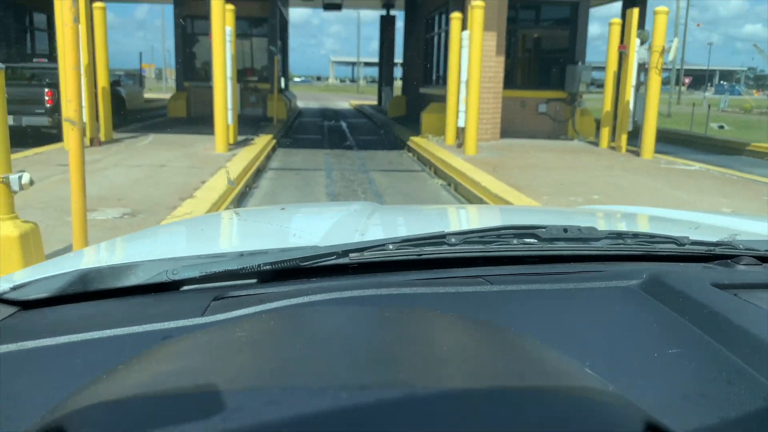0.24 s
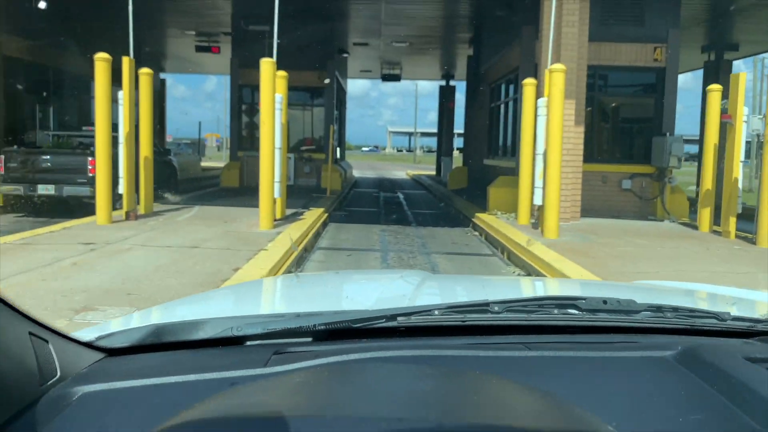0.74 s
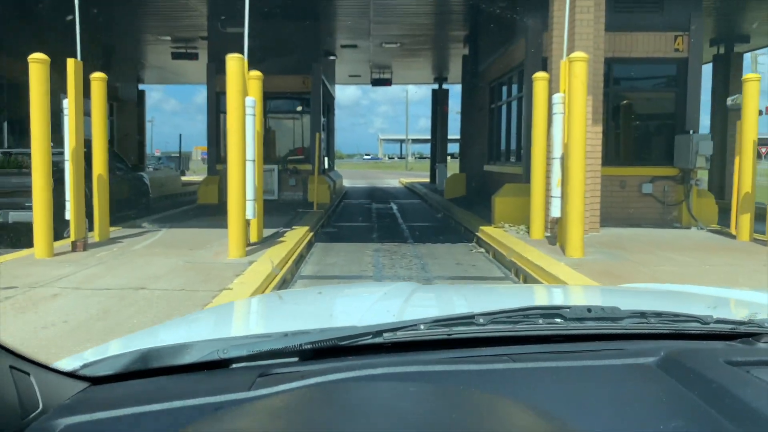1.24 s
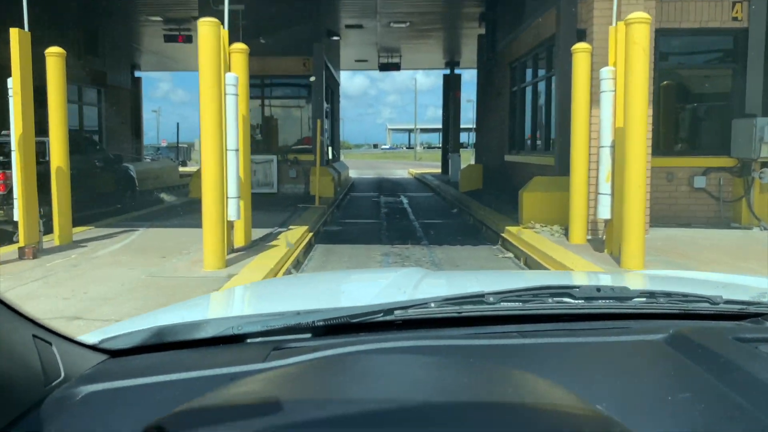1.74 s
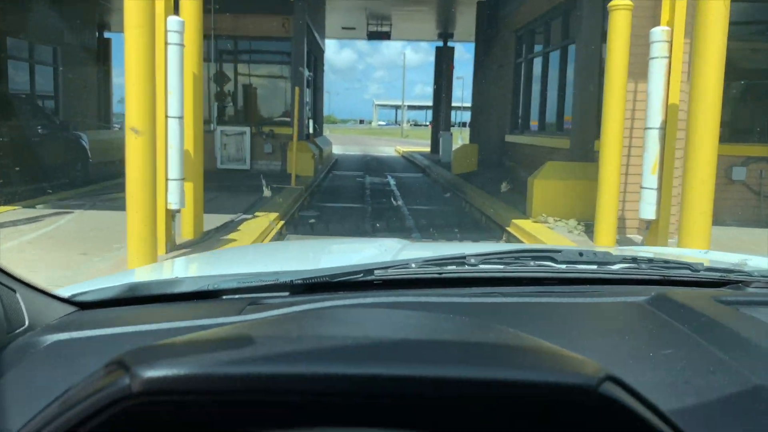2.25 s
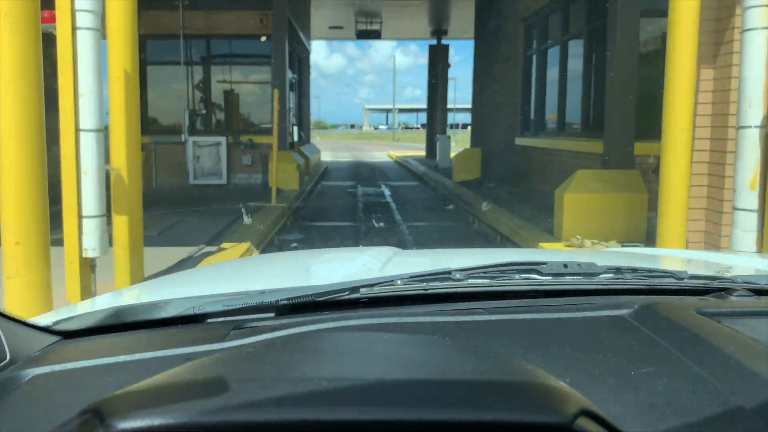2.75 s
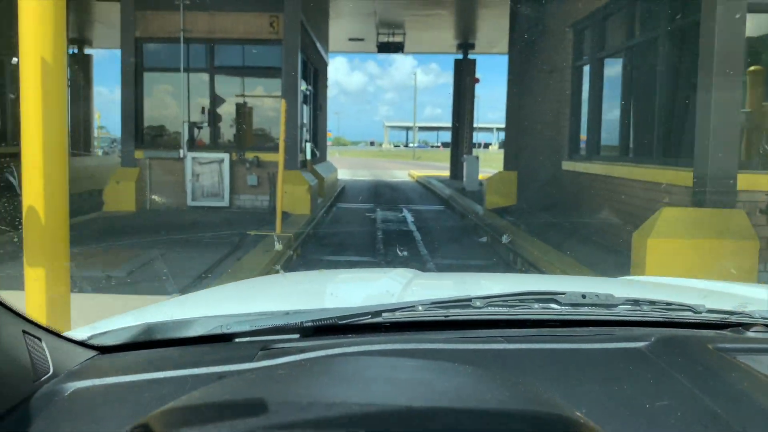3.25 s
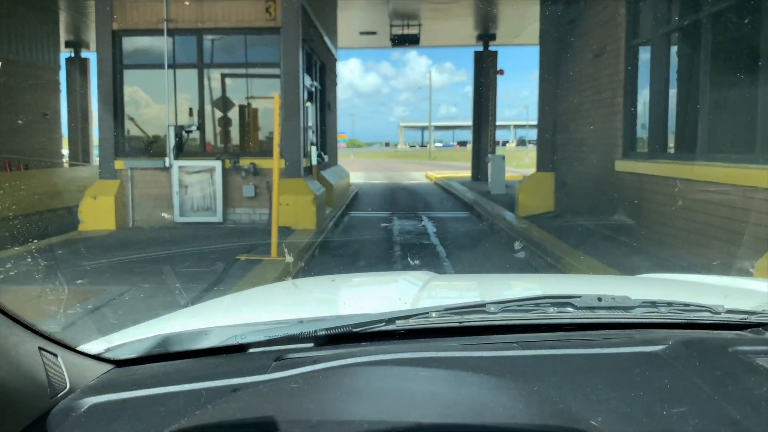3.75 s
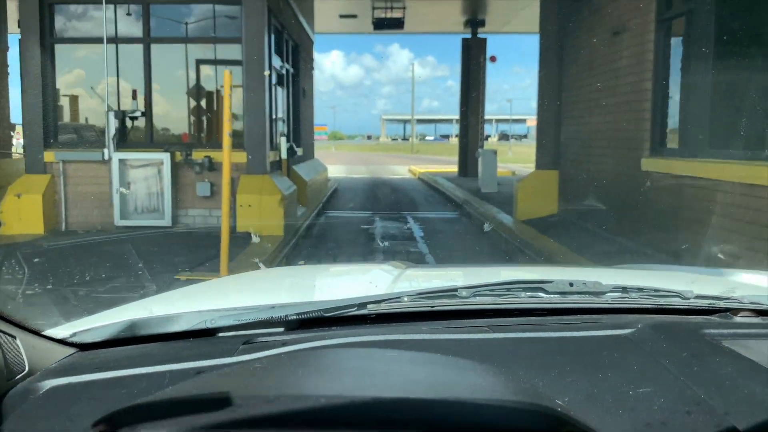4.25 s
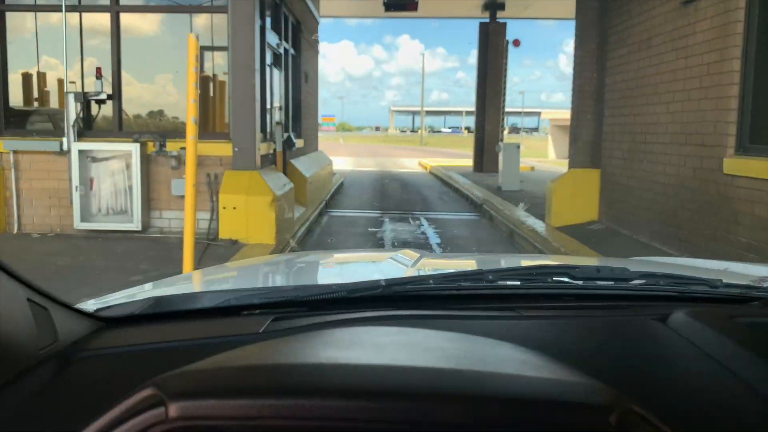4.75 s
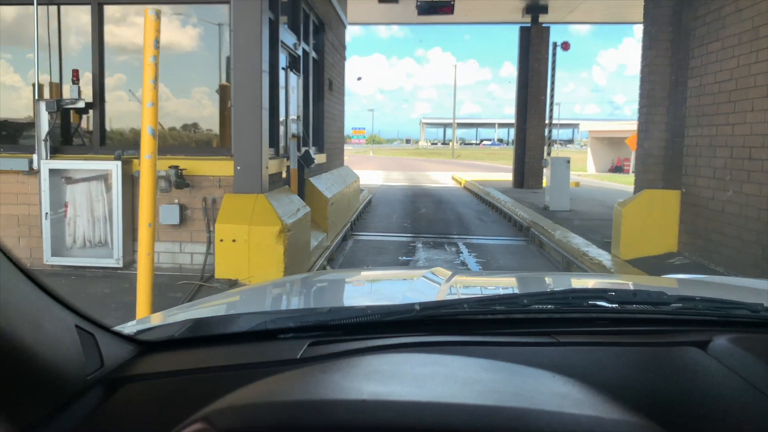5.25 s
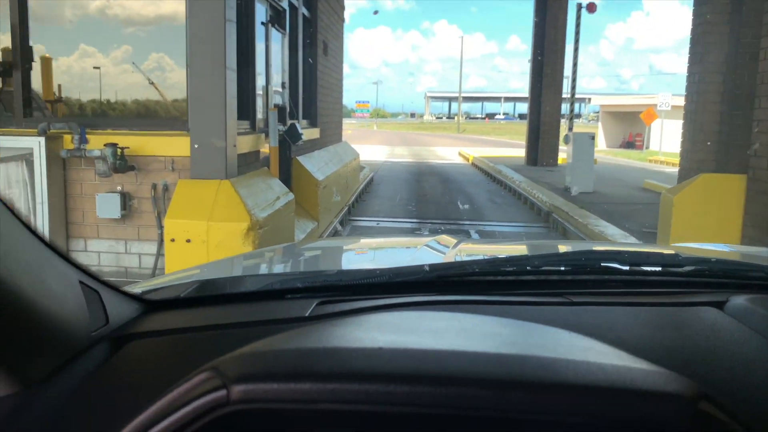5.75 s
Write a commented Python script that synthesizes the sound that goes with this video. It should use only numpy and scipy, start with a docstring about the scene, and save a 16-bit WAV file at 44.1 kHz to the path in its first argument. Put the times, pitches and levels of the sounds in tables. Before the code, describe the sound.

From inside a cab, low tyre rumble as a truck creeps over loose steel plates that slam and clang, with thin high brake squeals.

```python
"""An electric pickup with a loaded trailer creeps onto a truck scale under a canopy, heard from the cab.
Tyre rumble, a tread drone, road hiss and a faint shimmer (shaped noise, tone, tiny tones) join a hum.
Dull knocks start just before 1 s; then plates grate and slam four times from 1 s to 4 s:
bouncing contacts excite noisy steel clangs, chassis thuds and ringing modes, and low sine tones follow.
From the first slam on, thin brake squeals hop between gliding tones; road hiss swells near 4 s."""
import sys
import numpy as np
from scipy import signal
from scipy.fft import rfft, irfft
from scipy.io import wavfile

SR = 44100
rng = np.random.default_rng(int(sys.argv[2]) if len(sys.argv) > 2 else 0)


def store_pcm(level_fs):
    """Save levels as 16-bit WAV."""
    pcm = np.round(np.clip(level_fs, -1, 1) * 32767).astype(np.int16)
    wavfile.write(sys.argv[1], SR, np.atleast_2d(pcm).T)


N = 265041
TIME = np.arange(N) / SR

# likeness of the cab's noise at the two microphones: in step in the bass, opposed in the middle
# (frequency [Hz], correlation [-1 to 1])
EAR_LIKENESS = [(40, 0.94), (200, 0.88), (290, 0.4), (400, 0.048), (540, -0.54), (750, -0.43),
                (1150, -0.73), (1750, -0.51), (2050, 0.55), (2450, 0.25), (2950, 0.077), (3500, -0.22),
                (4500, 0.07), (5700, -0.12), (8000, -0.024)]

# rolling levels before each layer's trim
# (time [s], rumble level [dB], road hiss level [dB], body boom level [dB])
ROLLING_LEVELS = [(0, -26.5, -36.5, -22), (.9, -29.5, -39.5, -26.5), (1.35, -24, -40.5, -27.5),
                  (1.8, -30, -40, -31), (2.6, -22, -38.5, -28.5), (3.05, -28.5, -37, -30.5),
                  (3.6, -26, -36.5, -28.5), (4.0, -18, -31.5, -26), (4.45, -27.5, -34, -29),
                  (5.3, -26.5, -34.5, -31.5), (6, -26.5, -37, -28.5)]
# colour of the tyre rumble (frequency [Hz], relative level [dB per Hz])
RUMBLE_COLOUR = [(18, -18), (30, -12), (38, -4), (55, 5.5), (75, 2.5), (105, 3), (130, 1.5), (185, -4),
                 (250, -14.5), (350, -21), (500, -18), (900, -97)]
# colour of the body panels' share of the rumble (frequency [Hz], relative level [dB per Hz])
BODY_COLOUR = [(90, -28), (140, 0.5), (178, 5), (240, -8), (340, -7.5), (420, -16.5), (600, -22.5),
               (1200, -50.5)]
# colour of the road hiss (frequency [Hz], relative level [dB per Hz])
HISS_COLOUR = [(200, -32), (420, 4), (600, 1), (900, 5), (1600, 2), (2200, -1), (3100, -4.5), (5200, -8),
               (6500, -12.5), (10000, -21.5), (13800, -36), (15000, -40)]
# air resonances of the cab that colour the rolling noise (centre [Hz], width [Hz], lift [dB])
CAB_MODES = [(196.7, 41, 3), (257.8, 22.7, 7), (345, 32, 4), (449, 32, 3.5), (710, 63, 5), (965, 45, 5),
             (1355, 60, 5.5), (2015, 75, 2)]
# tread blocks meeting the road at a rate that follows speed (time [s], pitch [Hz], level [dB])
TREAD_COURSE = [(0, 60.85, -40), (.85, 69.4, -28.5), (1.8, 73.4, -27.5), (3.0, 76, -29.5), (3.6, 78.2, -25),
                (4.4, 79.77, -32), (6, 76, -38)]
# the drone swells once in each wheel turn; one such swell peaks at SWELL_S
BLOCKS_PER_TURN, SWELL_S, SWELL_DB = 67.8, 0.77, 4
# largest delay of a shimmer tone between the microphones
PORT_LAG_S = 19 / SR
# centre of each wavering compressor tone (pitch [Hz], level [dB])
HUM_TONES = [(46.2, -30), (124, -41)]

# dull knocks of trailer and plates, some of them late bounces after the slams (time [s], level [dB])
DULL_KNOCKS = [(0.852, -32), (2.41, -30), (2.59, -24.5), (2.625, -31), (3.48, -25), (3.504, -35),
               (3.783, -16.5), (3.855, -21), (4.141, -30), (4.19, -24), (4.31, -22.5), (4.79, -23),
               (4.815, -32.5)]
# colour of a knock (frequency [Hz], relative level [dB per Hz])
KNOCK_COLOUR = [(120, 16), (280, 21), (550, 8.5), (900, 4.5), (2200, 0), (3800, -16.5), (5500, -12),
                (12000, -37)]

# the tyre presses a plate onto its seat just before it slams (time [s], level [dB])
PLATE_SCUFFS = [(1.005, -31.5), (2.241, -21.5), (3.696, -21.5)]
# colour of a scuff (frequency [Hz], relative level [dB per Hz])
SCUFF_COLOUR = [(150, 3), (500, 0), (800, 7.5), (1500, 1), (2400, 0), (3700, -7), (4500, -21), (12000, -33)]

# a wheel drops on a loose plate
# (time [s], clang level [dB], thud level [dB], slowness of the bounces [factor],
#  pitch favoured by the strike point [Hz], brightness [dB per octave], extra clang of first touch [dB])
PLATE_SLAMS = [(1.053, -11, -14, 0.88, 1370, 0.1, -0.5), (2.279, -10.5, -13, 0.88, 2700, 0.56, 2),
               (3.705, -10, -11, 1.0, 1500, 0.9, -1), (3.996, -11, -12, 1.15, 2400, 1, -1.5)]
# bounce pattern shared by all slams, before slowness and scatter
# (time after the first touch [s], clang change [dB], thud change [dB])
PLATE_BOUNCES = [(0, -3.5, -4), (.017, -1, -0.5), (.031, -3.5, -5), (.052, -7.5, -5.5), (.1, -15, -8),
                 (.17, -43, -8)]
# colour of a plate's dense higher modes (frequency [Hz], relative level [dB per Hz])
CLANG_COLOUR = [(200, -28), (400, -1), (580, -1), (720, 5.5), (1050, 4.5), (1550, 3.5), (2150, 1),
                (2800, -4.5), (3900, -4), (5000, -7.5), (6500, -11), (10000, -15), (14000, -22),
                (15500, -55)]
# colour of the thud that comes through the chassis (frequency [Hz], relative level [dB per Hz])
THUD_COLOUR = [(22, -40), (60, -12), (120, 1), (185, 3.5), (250, -2), (320, -5), (380, -5), (470, -10.5),
               (600, -21.5), (1200, -73)]
# strongest ringing modes of a plate (pitch [Hz], relative level [dB], decay t60 [s])
PLATE_MODES = [(189.7, 0, 0.35), (215.3, -2, 0.26), (251, -8, 0.32), (276, -8, 0.33), (355.6, -11, 0.76),
               (384, -12.5, 0.37), (466, -13.5, 0.43), (698, -7, 0.35), (1310, -8, 0.24), (2060, -10, 0.23),
               (2290, -17, 0.17)]
RING_SIZE = 2 ** 15  # length of a plate or chassis response [samples]

# low ringing tones that follow each slam (time [s], pitch [Hz], level [dB], decay t60 [s])
LOW_TONES = [(1.066, 182.7, -6, 0.26), (1.088, 346, -15, .14), (1.149, 103, -9, 0.5), (2.289, 83, -17, 0.3),
             (2.293, 183.8, -10, 0.51), (2.3, 54, -11, 0.23), (2.32, 257.4, -18, .4),
             (3.71, 108, -12.5, 0.43), (3.745, 184.8, -10, 0.37), (3.787, 344, -13.5, 0.12),
             (4.004, 181, -13.5, 0.55), (4.026, 66, -12.5, 0.86), (4.135, 349, -19, .25),
             (4.188, 348.3, -18, 0.18)]

# the dragging brakes ring in one mode after another
# (chatter [0 to 1], left minus right [dB], lag at the left microphone [s],
#  course as rows of (time [s], pitch [Hz], level before trim [dB]))
BRAKE_SQUEALS = [ (0.16, -7, 0.000398, [(1.083, 8000, -37), (1.152, 8220, -32.5), (1.182, 8180, -28.5),
                 (1.212, 8230, -27.5), (1.327, 8180, -55)]), (1, -3, 0.000407, [(1.192, 8900, -59),
                 (1.287, 8780, -31.5), (1.407, 8750, -26.5), (1.467, 8770, -31), (1.537, 8800, -26),
                 (1.716, 8840, -62)]), (0.69, 0, .00039, [(1.232, 10570, -65), (1.277, 10340, -47),
                 (1.367, 10270, -29), (1.412, 10270, -39), (1.437, 10270, -33), (1.586, 10320, -42.5),
                 (1.601, 10260, -37), (1.626, 10360, -25.5), (1.696, 10350, -28.5), (1.755, 10350, -35),
                 (1.836, 10430, -31.5), (2.01, 10510, -60), (2.28, 10400, -53)]),
                 (0.1, -8, 0.000396, [(1.442, 8240, -58), (1.507, 8190, -41), (1.586, 8260, -58),
                 (1.641, 8190, -33), (1.691, 8200, -41), (1.796, 8195, -33), (1.936, 8240, -52)]),
                 (0.43, -10.5, 0.000385, [(1.891, 8610, -66), (1.911, 8650, -35.5), (1.941, 8500, -40),
                 (1.995, 8530, -26.5), (2.2, 8470, -69)]), (0.36, -5, .00042, [(2.09, 7400, -73),
                 (2.13, 7140, -39), (2.17, 7130, -45), (2.23, 7190, -64)]),
                 (0.093, -1, 0.000396, [(2.345, 7950, -34), (2.385, 8030, -26.5), (2.494, 7880, -42),
                 (2.539, 7970, -24.5), (2.604, 7930, -50), (2.629, 7990, -39), (2.784, 7997, -28.5),
                 (2.849, 8130, -47), (2.973, 8050, -37.5), (3.033, 8050, -41), (3.068, 8110, -30.5),
                 (3.138, 8150, -68)]), (0.3, -0.5, 0.0003986, [(3.193, 9400, -52), (3.233, 9230, -36.5),
                 (3.407, 9280, -52), (3.447, 9320, -35), (3.512, 9290, -30.5), (3.632, 9370, -45),
                 (3.727, 9320, -31.5), (3.816, 9450, -42)]), (0.1, -1, .00039, [(3.322, 10500, -67),
                 (3.367, 10760, -38.5), (3.407, 10710, -42), (3.497, 10740, -70)]),
                 (0.26, -6.5, 0.00041, [(3.392, 8780, -66), (3.427, 8770, -45), (3.612, 8730, -34),
                 (3.677, 8900, -64)]), (0.1, -6, .00039, [(3.542, 10440, -66), (3.642, 10410, -43),
                 (3.697, 10340, -45)]), (0.2, 5, 0.00041, [(3.821, 8830, -51), (3.881, 8950, -34.5),
                 (3.996, 8970, -53)]), (0.1, 1, 0.0004, [(3.861, 10360, -49), (3.956, 10550, -40),
                 (3.996, 10580, -39)]), (0.59, 1, 0.000398, [(4.111, 9460, -50), (4.185, 9260, -35.5),
                 (4.29, 9360, -52), (4.385, 9200, -70)]), (0.52, -4, 0.00041, [(4.121, 8760, -42),
                 (4.34, 8760, -36.5), (4.405, 8660, -54), (4.42, 8730, -54)]),
                 (0.36, -3.5, .00041, [(4.3, 8380, -52), (4.35, 8470, -42), (4.48, 8280, -32),
                 (4.649, 8580, -34.5), (4.779, 8500, -58)]), (0.2, 0, 0.000398, [(4.624, 9400, -64),
                 (4.659, 9380, -59), (4.779, 9540, -56)]), (1, -4.5, .000397, [(4.814, 8830, -46),
                 (4.879, 8790, -36.5), (4.954, 8810, -34.5), (5.01, 8750, -28), (5.075, 8745, -33),
                 (5.145, 8670, -26.5), (5.2, 8740, -31.5), (5.258, 8720, -37.5), (5.418, 8770, -52)]),
                 (0.66, -1, .000394, [(5.353, 10000, -60), (5.403, 10020, -37.5), (5.463, 9920, -45.5),
                 (5.552, 10070, -37.5), (5.777, 10000, -48), (5.817, 10150, -41), (6.001, 10120, -56.5)]),
                 (0.11, -3.5, 0.000415, [(5.433, 6780, -66), (5.488, 6690, -43), (5.837, 6760, -43.5),
                 (5.961, 6800, -53), (6.001, 6760, -42.5)]), (0.1, 0, .000383, [(5.612, 11640, -63),
                 (5.712, 11640, -43), (5.802, 11620, -55), (5.847, 11700, -53)]),
                 (0.92, -4, .00042, [(4.52, 5010, -54), (4.57, 5040, -47), (4.63, 5020, -51)]),
                 (1, -2, 0.00043, [(4.82, 5100, -62), (4.87, 5050, -53), (4.94, 5050, -62)]),
                 (1, -4, .00042, [(5.63, 5020, -60), (5.72, 5080, -55), (5.82, 5080, -62)]),
                 (0.89, -1, 0.000384, [(5.4, 13300, -64), (5.6, 13300, -62), (5.95, 13520, -65)])]
# moments when the pad grabs and the squeal flares (time [s], level [dB])
PAD_GRABS = [(1.616, -15), (1.762, -13.5)]
WALL_T60_S, WALL_DB = 0.18, -10  # reflections of the squeal
TOP_HZ = 15700  # where the treble is cut


def undb(db):
    """Decibels to gain."""
    return 10 ** (np.asarray(db) / 20)


def unit(x):
    """Scale to rms 1."""
    return x / np.sqrt(np.mean(x ** 2))


def curves(rows):
    """The columns of a table, joined by straight lines in time."""
    times, *columns = np.transpose(rows)
    return [np.interp(TIME, times, column) for column in columns]


def fade(t, t60):
    """Exponential decay that starts at t = 0 and falls 60 dB in t60 seconds."""
    return (t >= 0) * np.exp(-np.log(1000) * np.maximum(t, 0) / t60)


def walk(rate_hz):
    """Smooth random wandering with spread 1 that changes about rate_hz times a second."""
    hz = np.fft.rfftfreq(N, 1 / SR)
    noise = rfft(rng.standard_normal(N))
    return unit(irfft(noise * np.exp(-(hz / rate_hz) ** 2), N))


def convolve(x, response):
    """Play a signal through a two-channel response."""
    return signal.fftconvolve(np.atleast_2d(x), response, axes=1)[:, :N]


def coloured(points, db, hz):
    """Read a colour table at the given frequencies, along a logarithmic frequency axis."""
    return np.interp(np.log(hz), np.log(points), db)


def field(spectrum, size=N):
    """Coloured noise filling the cab, as the two microphones hear it."""
    hz = np.fft.rfftfreq(size, 1 / SR) + 1e-3  # keeps the logarithm finite at zero
    mid, side = rfft(rng.standard_normal((2, size)))
    alike = np.clip(np.interp(hz, *np.transpose(EAR_LIKENESS)), -0.98, 0.98)
    # the shared part meets an opposed part in the ratio that gives the wanted correlation
    opposed = side * np.array([[1], [-1]])
    ports = np.sqrt(1 + alike) * mid + np.sqrt(1 - alike) * opposed
    points, db = np.transpose(spectrum)
    return unit(irfft(ports * undb(coloured(points, db, hz)), size))


def panned(x, left_db):
    """Set the left-minus-right level; negative values lean to the right."""
    return x * undb(np.array([[left_db], [-left_db]]) / 2)


def strikes(times, db, rattle=0.43, rattle_t60=0.14, count=12):
    """A sharp contact for each blow, then a spray of small chattering ones."""
    force = np.zeros(N)
    chances = rng.random((len(times), 2, count))
    for s, gain, (delay_chance, size_chance) in zip(times, undb(db), chances):
        after = delay_chance * rattle_t60 / 2
        force[int(s * SR)] += gain
        small = gain * rattle * (2 * size_chance - 1) * fade(after, rattle_t60)
        force[((s + after) * SR).astype(int)] += small
    return force


def tyres(grain_db=0.36, sway_db=0.5, rumble_gain_db=0.0, body_gain_db=-2.5, hiss_gain_db=-2.5):
    """Rumble and panel boom through the body, the tread drone, and hiss thrown back by the booths."""
    rumble_db, hiss_db, body_db = curves(ROLLING_LEVELS)
    rumble = field(RUMBLE_COLOUR) * undb(rumble_db + rumble_gain_db + sway_db * walk(5.3))
    body = field(BODY_COLOUR) * undb(body_db + body_gain_db + sway_db * walk(9.3))
    hiss_motion_db = grain_db * walk(78) + 0.9 * walk(8.0)
    hiss = field(HISS_COLOUR) * undb(hiss_db + hiss_gain_db + hiss_motion_db)
    return cab(panned(rumble + drone(), -1.7) + panned(body, 0.91) + hiss)


def drone(waver_hz=1.13, waver_db=2.0):
    """The tread hums at a pitch that follows speed, and swells with each turn of the wheel."""
    hz, db = curves(TREAD_COURSE)
    turns = np.cumsum(hz) / SR / BLOCKS_PER_TURN
    turns_from_swell = turns - np.interp(SWELL_S, TIME, turns)
    swell_db = SWELL_DB * np.cos(2 * np.pi * turns_from_swell)
    cycles = np.cumsum(hz + waver_hz * walk(3.4)) / SR
    return unit(np.sin(2 * np.pi * cycles)) * undb(db + swell_db + waver_db * walk(6.8))


def cab(x):
    """The cab's air lifts the sound around each of its resonances."""
    hz = np.fft.rfftfreq(N, 1 / SR)
    lift_db = sum(db / (1 + (2 * (hz - centre) / width) ** 2) for centre, width, db in CAB_MODES)
    return irfft(rfft(x) * undb(lift_db), N)


def shimmer(db=-8, low_hz=600, high_hz=2800, t60=0.18, scatter_db=5, tilt=0.1, count=1500):
    """A faint shimmer of many tiny, short tones, its level following the road hiss."""
    t = TIME[:SR // 20]  # each tone is cut off after 50 ms
    out = np.zeros((2, N))
    for when, pitch, size, angle in rng.random((count, 4)):
        hz = low_hz * (high_hz / low_hz) ** pitch
        ports = np.array([t, t - (2 * angle - 1) * PORT_LAG_S])
        start = int(when * (N - len(t)))
        gain = undb(scatter_db * size) * hz ** -tilt
        out[:, start:start + len(t)] += gain * np.sin(2 * np.pi * hz * ports) * fade(ports, t60)
    hiss_db = curves(ROLLING_LEVELS)[1]
    return unit(out) * undb(db + hiss_db)


def compressor(waver_hz=0.56, waver_db=2.5):
    """The cooling compressor's low tones hold on, wavering a little in pitch and level."""
    hum = np.zeros(N)
    for hz, db in HUM_TONES:
        cycles = np.cumsum(hz + waver_hz * walk(2.34)) / SR
        hum += unit(np.sin(2 * np.pi * cycles)) * undb(db + waver_db * walk(7.4))
    return panned(hum, -6.0)


def knocks(t60=0.35, rise_t60=0.022):
    """Trailer and plates knock dully, some as late bounces after the slams: soft-edged noise bursts."""
    t = TIME[:SR]
    knock = field(KNOCK_COLOUR, size=SR) * fade(t, t60) * (1 - fade(t, rise_t60))
    return convolve(strikes(*np.transpose(DULL_KNOCKS)), knock)


def scuffs(t60=0.3, rise_t60=0.034):
    """Steel grates briefly on its seat as the wheel reaches the plate."""
    t = TIME[:SR]
    scrape = field(SCUFF_COLOUR, size=SR) * fade(t, t60) * (1 - fade(t, rise_t60))
    return convolve(strikes(*np.transpose(PLATE_SCUFFS)), scrape)


def blows(scatter_s=0.0015):
    """The patterned bounces of every slam, scattered: (s, clang dB, thud dB, favoured Hz, brightness)."""
    rows = []
    for s, clang, thud, slowness, ring_hz, tilt, touch in PLATE_SLAMS:
        for delay, clang_change, thud_change in PLATE_BOUNCES:
            # the first touch is exactly on time and has its own extra clang
            when = s + slowness * delay + scatter_s * rng.standard_normal() * (delay > 0)
            clang_db = clang + clang_change + touch * (delay == 0)
            rows.append((when, clang_db, thud + thud_change, ring_hz, tilt))
    return rows


def struck(spectrum, ring_hz, tilt_db, ring_db=3.5, ring_octaves=0.37, patchy_db=2.5, count=90):
    """Each strike point favours the plate's modes around one pitch, and sounds brighter or duller."""
    points, db = np.transpose(spectrum)
    hz = np.geomspace(points[0], points[-1], count)
    octaves = np.log2(hz / ring_hz)
    colour_db = ring_db * np.exp(-(octaves / ring_octaves) ** 2) + tilt_db * octaves
    uneven_db = patchy_db * rng.standard_normal(count)
    return np.transpose([hz, coloured(points, db, hz) + colour_db + uneven_db])


def clangs(t60=0.26, rise_t60=0.034, canopy_t60=0.79, canopy_db=-13, clang_db=-2.0,
           canopy_hz=6000, grain_db=0.6):
    """Each blow rings a plate's dense modes with a rattling grain; the canopy adds a longer, duller tail."""
    t, out = TIME[:RING_SIZE], np.zeros((2, N))
    dull = signal.butter(1, canopy_hz, fs=SR, output="sos")
    reflected = signal.sosfilt(dull, field(CLANG_COLOUR, size=RING_SIZE))
    echo = undb(canopy_db) * reflected * fade(t, canopy_t60)
    for s, db, _, ring_hz, tilt in blows():
        plate = field(struck(CLANG_COLOUR, ring_hz, tilt), size=RING_SIZE) * fade(t, t60)
        # the plates lie out of sight under the truck, so their sound builds up by reflection
        steel = (plate + echo) * (1 - fade(t, rise_t60))
        span = slice(int(s * SR), int(s * SR) + RING_SIZE)
        out[:, span] += convolve(strikes([s], [db])[span], steel)[:, :RING_SIZE]
    return undb(clang_db + grain_db * walk(78)) * out


def thuds(rise_t60=0.0035, ring_db=-9.5, t60=0.44, thud_db=-0.5, across_s=0.00037):
    """The chassis carries each blow as a thud, with the plate's strongest modes ringing on."""
    times, _, db, _, _ = np.transpose(blows())
    t = TIME[:RING_SIZE]
    body = field(THUD_COLOUR, size=RING_SIZE) * fade(t, t60)
    # standing waves across the cab put the two microphones out of step
    ports = np.array([t, t - across_s])
    ring = sum(undb(gain_db) * np.sin(2 * np.pi * hz * ports) * fade(ports, decay)
               for hz, gain_db, decay in PLATE_MODES)
    response = (undb(thud_db) * body + undb(ring_db) * ring) * (1 - fade(t, rise_t60))
    return panned(convolve(strikes(times, db), response), -0.5)


def low_ringing(rise_t60=0.011):
    """Low ringing tones follow each slam, each a decaying sine with a soft onset."""
    ringing = np.zeros(N)
    for s, hz, db, t60 in LOW_TONES:
        t = TIME - s
        envelope = fade(t, t60) * (1 - fade(t, rise_t60))
        ringing += undb(db) * np.sin(2 * np.pi * hz * t) * envelope
    return panned(ringing, -3.5)


def brakes(clean_hz=3, chatter_hz=36, slip_hz=70, jitter_hz=4, chatter_jitter_hz=22, wander_hz=5,
           squeal_db=-0.5, flutter_db=2.5, throb_db=2.5):
    """Squeals hop from mode to mode and throb as the pad chatters; reflections flutter between the ears."""
    slip = np.sin(2 * np.pi * np.cumsum(slip_hz * (1 + 0.159 * walk(25.5))) / SR)
    jitter = walk(120.0)
    # pitch shake in Hz: a part in every squeal, and a part that grows with its chatter
    smooth = clean_hz * slip + jitter_hz * jitter + wander_hz * walk(9.6)
    rough = chatter_hz * slip + chatter_jitter_hz * jitter
    dry = np.zeros((2, N))
    for chatter, left_db, lag, rows in BRAKE_SQUEALS:
        throb = undb(throb_db * chatter * slip)
        dry += panned(squeal(rows, smooth + chatter * rough, lag) * throb, left_db)
    # pad pressure is never quite even
    dry = dry * undb(squeal_db + flutter_db * walk(42)) + grabs(jitter)
    walls = rng.standard_normal((2, SR // 2)) * fade(TIME[:SR // 2], WALL_T60_S)
    walls = walls / np.sqrt(np.sum(walls[0] ** 2))
    return dry + undb(WALL_DB) * convolve(dry[1], walls)


def squeal(rows, shake_hz, lag_s, edge_s=0.0025):
    """One friction-driven brake mode swells and bends with pad pressure, shaken by the slipping pad."""
    hz, db = curves(rows)
    start_s, end_s = rows[0][0], rows[-1][0]
    gate = np.clip(np.minimum(TIME - start_s, end_s - TIME) / edge_s, 0, 1)
    # it comes from the right, so the left microphone's phase is late
    cycles = np.cumsum(hz + shake_hz) / SR - hz * np.array([[lag_s], [0]])
    return np.sqrt(2) * np.sin(2 * np.pi * cycles) * undb(db) * gate


def grabs(jitter, hz=10380, spread_hz=70, t60=0.08, rise_t60=0.026):
    """The pad catches for an instant and its squeal flares into a rough burst."""
    flare = sum(undb(db) * fade(TIME - s, t60) * (1 - fade(TIME - s, rise_t60)) ** 2
                for s, db in PAD_GRABS)
    return flare * np.sin(2 * np.pi * np.cumsum(hz + spread_hz * jitter) / SR)


def scene():
    """Everything that reaches the cab."""
    rolling = tyres() + shimmer() + compressor()
    slams = scuffs() + clangs() + thuds() + low_ringing()
    return rolling + knocks() + slams + brakes()


def record(dry):
    """The microphones' electronics round the highest peaks and cut the top."""
    rounded = dry / (1 + dry ** 6) ** (1 / 6)
    treble_cut = signal.ellip(8, 0.2, 70, TOP_HZ, fs=SR, output="sos")
    return signal.sosfilt(treble_cut, rounded)


dry = scene()
out = record(dry)
store_pcm(out)
```